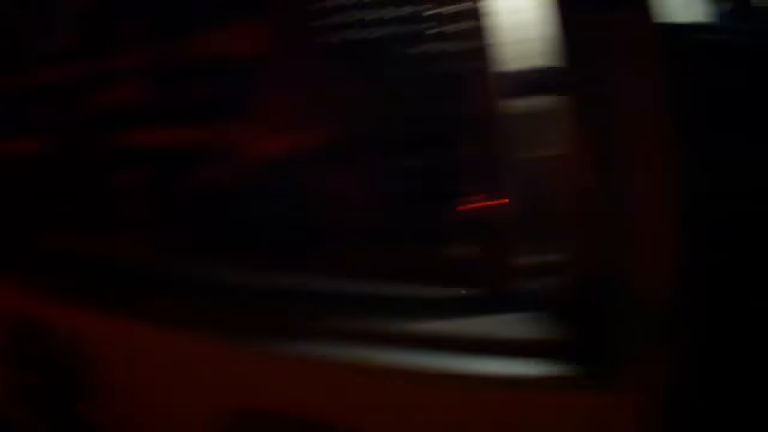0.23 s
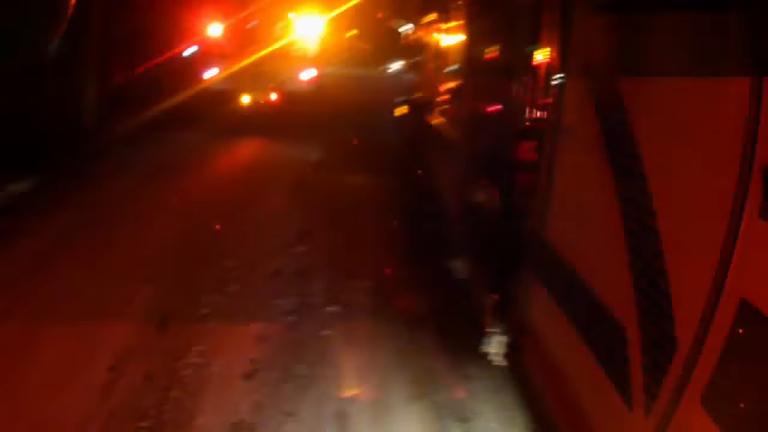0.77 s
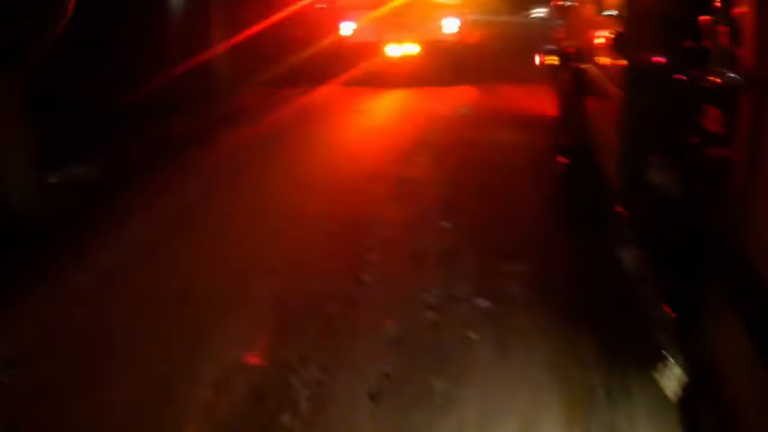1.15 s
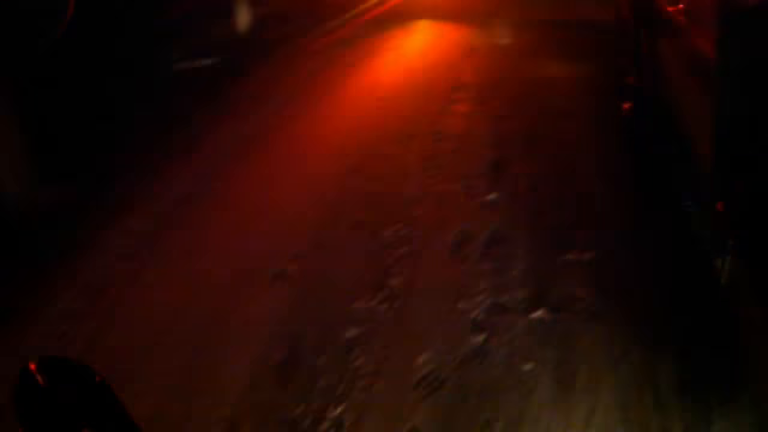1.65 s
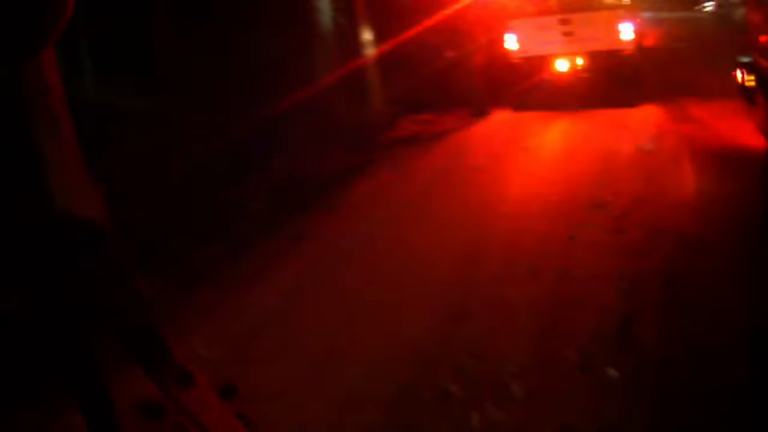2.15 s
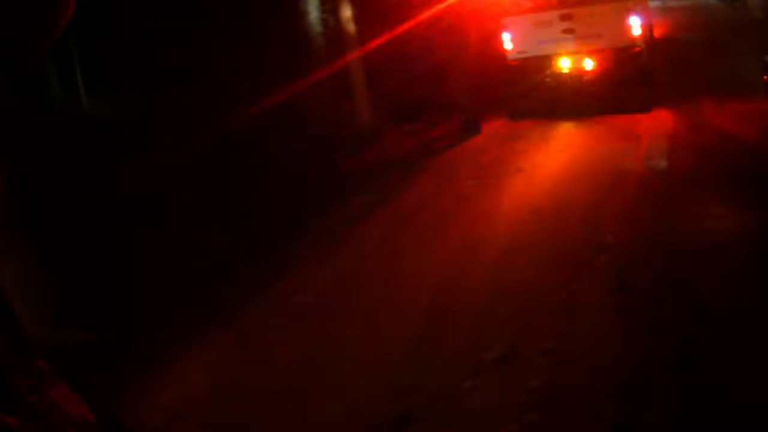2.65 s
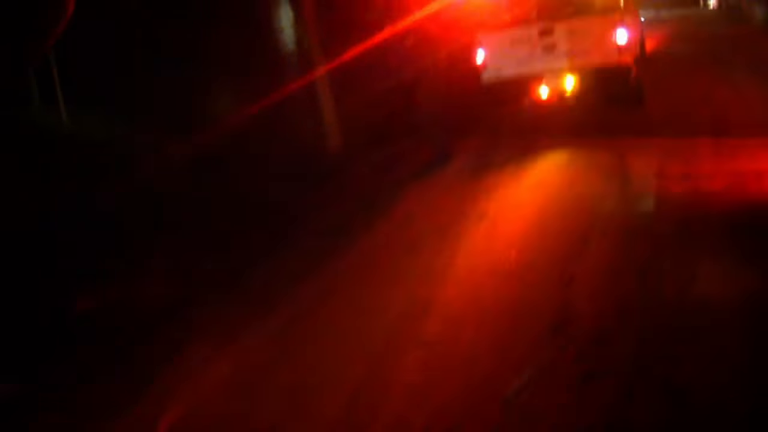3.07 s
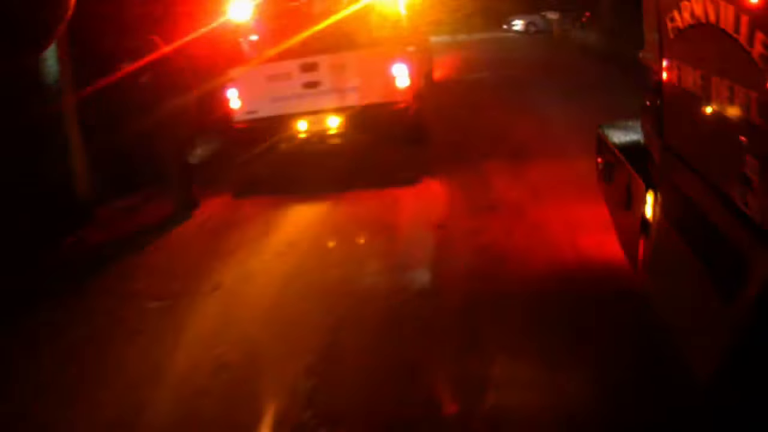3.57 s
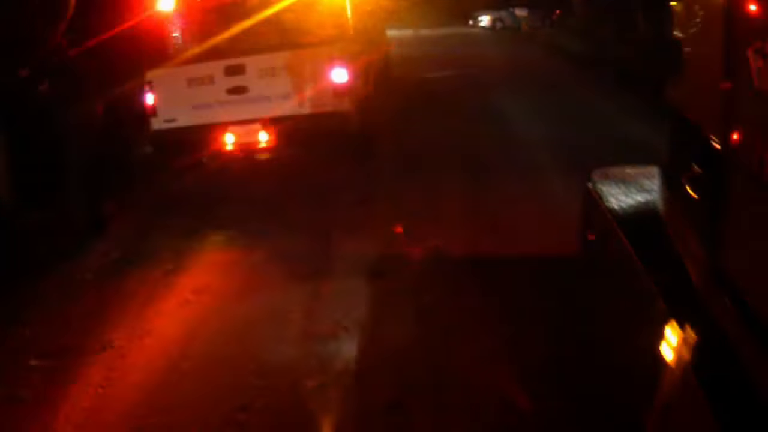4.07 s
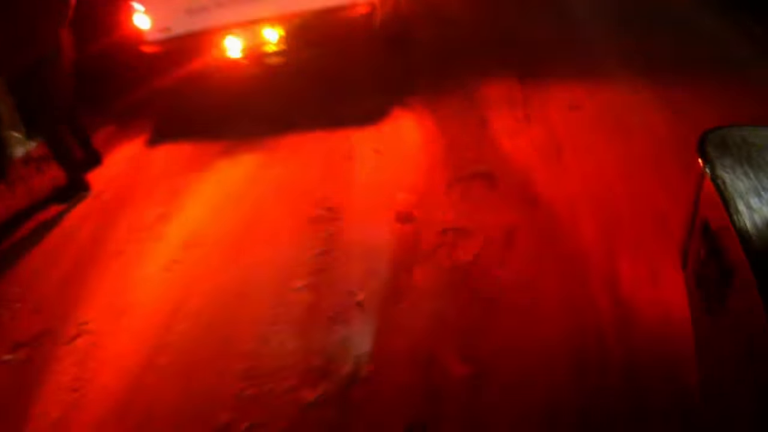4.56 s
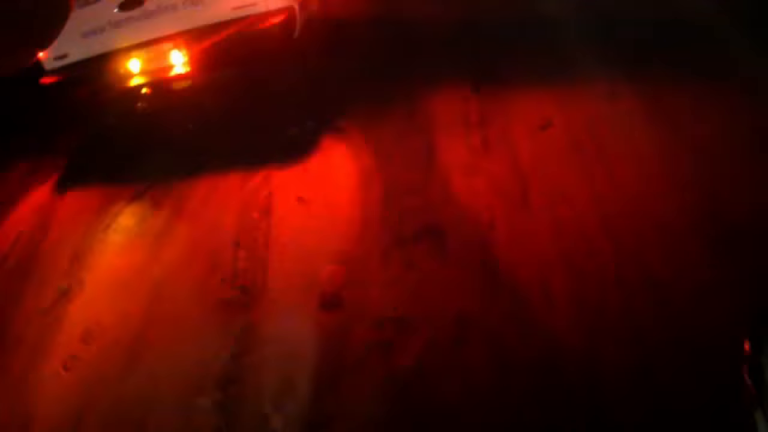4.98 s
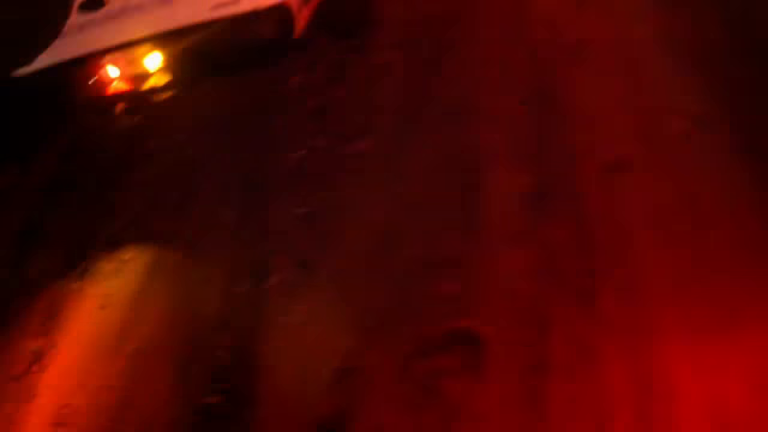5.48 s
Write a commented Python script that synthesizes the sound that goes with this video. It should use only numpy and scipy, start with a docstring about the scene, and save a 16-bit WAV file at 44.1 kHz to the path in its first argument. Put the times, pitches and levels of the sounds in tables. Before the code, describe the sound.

After a brief metallic clink, a big diesel engine runs at high idle, humming, rattling and faintly whistling, slowly growing louder.

```python
"""Walking past a diesel truck

Night; a six-cylinder at fast idle. Its pump hums, swelling and fading along the path. Exhaust orders
throb in a low roar, the block clatters once a firing, the turbocharger whistles over intake hiss.
A metal latch clinks at the start, two dull taps follow. A small housing colours it all."""
import sys
import numpy as np
from scipy import signal
from scipy.io import wavfile
from scipy.ndimage import uniform_filter1d

SR = 44100
rng = np.random.default_rng(int(sys.argv[2]) if len(sys.argv) > 2 else 0)


def wrap_up_sound(samples):
    """Save the sound to the file named by the first command line argument, as 16-bit audio."""
    columns = np.atleast_2d(samples).T
    # keep every value between -1 and 1, then stretch to whole-number steps
    tamed = np.clip(columns, -1, 1)
    steps = np.round(tamed * 32767).astype(np.int16)
    wavfile.write(sys.argv[1], SR, steps)


N = 253120
FIRING_HZ, PUMP_HZ, SOUND_M_PER_S = 50.13, 180.9, 343
KNOCK_OFFSET_S, CUTOFF_HZ = .034, 15700

# pump hum along the path: t/s, level/dB
PUMP_LEVEL = [(0.0, -22), (0.25, -27), (0.37, -22), (0.69, -20), (0.88, -23.5), (1.06, -15.5), (1.2, -18.5),
              (1.3, -13), (1.8, -21.5), (1.9, -17), (2.22, -16), (2.49, -27.5), (3.04, -22), (3.42, -27.5),
              (3.5, -38), (3.74, -28), (3.95, -37), (4.3, -41), (4.4, -25.5), (4.86, -13), (5.02, -17.5),
              (5.21, -13.5), (5.35, -17.5), (5.48, -13.5), (5.74, -15.5)]
# pump overtones and a side line: multiple, level/dB re roar, waver/dB
PUMP_PARTIALS = [(2, -12.5, 3.5), (2.145, -15, 0.5), (3, -18.5, 2.5)]
# pump whines: multiple, level/dB re clatter, width/Hz
PUMP_WHINES = [(7.015, -18, 14), (13.9, -20, 35)]
# engine along the path: t/s, roar/dB, clatter/dB, upper hiss/dB, clatter tilt/(dB/octave)
ENGINE_PATH = [(0.0, -36.5, -40, -63, 0.3), (0.13, -36, -45, -65, -0.7), (0.65, -32, -38, -56, 0.7),
               (1.21, -28, -36, -53.5, 0.3), (1.28, -31.5, -37.5, -54.5, -0.6),
               (1.92, -31.5, -35, -52, -0.4), (2.4, -31, -32, -49, 2), (3.12, -25.5, -31, -48, 0.7),
               (3.18, -28.5, -31.5, -48.5, 0.3), (3.42, -25, -31.5, -50, -0.6),
               (4.08, -26, -28.5, -50.5, 1.8), (4.25, -26.5, -29, -51.5, -0.5),
               (4.47, -28.5, -30.5, -54.5, 0.3), (4.86, -25, -31.5, -58.5, -0.8),
               (5.48, -20.5, -28.5, -52.5, 1.2), (5.74, -25, -28, -52, 5.5)]
# exhaust low end: t/s, rumble/dB, firing harmonics 1, 2, 3/dB
EXHAUST_LEVELS = [(0, -28, -50, -46, -55), (.5, -30.5, -42, -30.5, -44.5), (1.4, -26.5, -43, -34, -44),
                  (1.8, -23.5, -47, -45, -27.5), (2.25, -24, -33, -31, -39), (2.75, -25.5, -43, -31.5, -32),
                  (3.25, -30, -36.5, -38.5, -35), (3.7, -24.5, -35, -29.5, -31),
                  (4.45, -28.5, -28, -31.5, -44), (5.1, -20, -31.5, -42.5, -27.5),
                  (5.74, -26.5, -32.5, -37, -32)]
# crankshaft orders: multiple of crank speed
CRANK_ORDERS = [2, 5, 7, 7.5, 12, 13, 14, 15, 16, 17, 18]
# per order: level/dB re roar
CRANK_ORDER_DB = [-20.5, -14, -20.5, -22, -10, -10.5, -15, -26.5, -24, -15.5, -22]
# knock per cylinder: level/dB
CYLINDER_DB = [0, -4, -4, -9, -9, -5]
# noise spectra through the housing: f/Hz, relative density/dB
RUMBLE_SPECTRUM = [(8, -42), (15, -12), (30, -11.5), (60, -3), (128, -4.5), (170, -1), (200, -8),
                   (230, -43.5)]
ROAR_SPECTRUM = [(150, -38), (175, 1.5), (200, 0), (300, -2.5), (380, -0.5), (440, -9), (480, -12.5),
                 (540, -48)]
GROWL_SPECTRUM = [(390, -40), (430, -6), (470, 1), (590, -4.5), (720, -9.5), (880, -17.5), (1050, -22),
                  (1300, -41)]
CLATTER_SPECTRUM = [(700, -34), (850, -21.5), (1020, -15), (1300, -11.5), (1600, -9.5), (1850, -3.5),
                    (2030, 2), (2200, -3.5), (2500, -11.5), (3050, -20.5), (3280, -28.5), (3400, -35),
                    (3500, -57)]
LOW_HISS_SPECTRUM = [(3250, -30), (3380, -10), (3550, -2), (3950, 0), (4500, -2), (4900, -4), (5150, -10),
                     (5400, -13), (5560, -20), (5650, -40)]
UPPER_HISS_SPECTRUM = [(5480, -40), (5580, -18), (5800, -10), (5920, 0), (6900, 0), (7250, -3), (7900, -2),
                       (8350, -7), (8800, -19), (9150, -28), (9300, -50)]
TOP_HISS_SPECTRUM = [(9000, -30), (9200, -9), (9650, -2), (10100, 0), (10600, -2), (11300, -8), (12000, -5),
                     (12500, -7), (13500, -10), (14000, -7), (14400, -14), (15200, -16), (15800, -20)]
# turbocharger: t/s, whistle/dB, octave/dB
TURBO_LEVELS = [(0, -70.5, -85), (.8, -61, -77), (1.6, -63.5, -81), (2.2, -60, -72.5), (2.9, -56, -67),
                (3.6, -57, -70), (4.2, -63.5, -67), (4.8, -75, -79.5), (5.74, -78.5, -90)]
# turbocharger whistle: t/s, f/Hz
TURBO_HZ = [(0, 5920), (.8, 5912), (1.5, 5885), (2, 5910), (2.5, 5978), (3, 6035), (3.6, 6080), (4.1, 6085),
            (5.2, 5945), (5.74, 5940)]
# latch blows: t/s, level/dB
LATCH_BLOWS = [(.027, -33), (.092, -48), (.163, -48), (.197, -46)]
# latch modes: f/Hz, level/dB, t60/s
LATCH_MODES = [(1992, -4, .15), (2347, 0, .17), (2772, -2, .09), (4570, -14, .15), (6718, -20, .28),
               (7881, -18, .3)]
# nearby taps: t/s, level/dB, centre/Hz
DULL_TAPS = [(1.072, -42, 1250), (1.136, -43, 1150)]
# walking away: t/s, speed/(m/s)
RECEDING_SPEED = [(0, 0), (4.2, 0), (4.8, 1.15), (5.74, 1.55)]


def pump():
    """Clean hum with weaker, rougher overtones and two fuzzy whines."""
    hz, (hum_db,) = doppler(PUMP_HZ), curves(PUMP_LEVEL)
    roar_db, clatter_db, _, _ = curves(ENGINE_PATH)
    partials = sum(tone(k * hz, db + roar_db, waver_db, wobble_rad=.058 * k, drift_hz=12)
                   for k, db, waver_db in PUMP_PARTIALS)
    whines = sum(whistle(k * hz, db + clatter_db, width_hz) for k, db, width_hz in PUMP_WHINES)
    return tone(hz, hum_db, waver_db=.79, wobble_rad=.07, drift_hz=12) + partials + whines


def firings(decay_s, scatter_db):
    """Knock envelope: quick rise, then decay; each cylinder has its own strength."""
    hz = doppler(FIRING_HZ)
    count = np.cumsum(hz) / SR - KNOCK_OFFSET_S * hz[0] + 6
    index, age_s = count.astype(int), count % 1 / hz
    db = np.array(CYLINDER_DB)[index % 6] + scatter_db * rng.standard_normal(index.max() + 1)[index]
    return uniform_filter1d(amp(db) * np.exp(-age_s / decay_s), size=40)


def exhaust(knock):
    """Firing harmonics and crank orders (three firings a turn) in rumble, pulsed roar and growl."""
    roar_db, clatter_db, _, _ = curves(ENGINE_PATH)
    rumble_db, *harmonic_db = curves(EXHAUST_LEVELS)
    hz = doppler(FIRING_HZ)
    harmonics = sum(tone(k * hz, db, waver_db=.6, wobble_rad=.2, drift_hz=6.6)
                    for k, db in enumerate(harmonic_db, 1))
    orders = sum(tone(k * hz / 3, db + roar_db, waver_db=4.4, wobble_rad=.43, drift_hz=3)
                 for k, db in zip(CRANK_ORDERS, CRANK_ORDER_DB))
    rumble = shaped_noise(1, RUMBLE_SPECTRUM, rumble_db - 2.5, patch_db=1.1)
    roar = shaped_noise(1 + .4 * knock, ROAR_SPECTRUM, roar_db + .4, patch_db=.5)
    growl_db = -35 + .2 * swing(roar_db) + .9 * swing(clatter_db)
    growl = shaped_noise(1 + .3 * knock, GROWL_SPECTRUM, growl_db, patch_db=1)
    return harmonics + orders + rumble + roar + growl


def block_clatter(knock):
    """Noise gated by the firings; brightness varies along the path."""
    _, clatter_db, _, _ = curves(ENGINE_PATH)
    tilts = [(t_s, tilt) for t_s, *_, tilt in ENGINE_PATH]
    return shaped_noise(1 + 1.1 * knock, CLATTER_SPECTRUM, clatter_db, patch_db=.8, tilts=tilts)


def intake_hiss(knock):
    """Three noise bands, only ruffled by the firings."""
    _, clatter_db, upper_db, tilt = curves(ENGINE_PATH)
    low_db = -53.5 + .38 * swing(upper_db) + .98 * tilt
    top_db = -71 + .6 * swing(upper_db) + .45 * swing(clatter_db) + .9 * tilt
    return (shaped_noise(1 + .24 * knock, LOW_HISS_SPECTRUM, low_db, patch_db=.7)
            + shaped_noise(1 + .5 * knock, UPPER_HISS_SPECTRUM, upper_db + .54, patch_db=1.5)
            + shaped_noise(1 + .3 * knock, TOP_HISS_SPECTRUM, top_db, patch_db=-.3))


def turbocharger():
    """Fuzzy whistle and its octave."""
    (hz,), (db, octave_db) = curves(TURBO_HZ), curves(TURBO_LEVELS)
    return whistle(hz, db, width_hz=35) + whistle(2 * hz, octave_db, width_hz=80)


def latch():
    """Each blow rings the same metal modes in a new balance."""
    out, t = np.zeros(N), np.arange(SR // 3) / SR
    attack = 1 - np.exp(-t / .0022)
    for start_s, blow_db in LATCH_BLOWS:
        scatter_db = 1.1 * rng.standard_normal(len(LATCH_MODES))
        ring = sum(amp(db + offset_db - 60 * t / t60_s) * np.sin(2 * np.pi * hz * t)
                   for (hz, db, t60_s), offset_db in zip(LATCH_MODES, scatter_db))
        out[round(start_s * SR):][:len(t)] += amp(blow_db) * ring * attack
    return out


def taps():
    """Brief, soft-edged bursts of band noise."""
    out, t = np.zeros(N), np.arange(900) / SR
    for start_s, db, hz in DULL_TAPS:
        band = signal.butter(3, [hz * .7, hz * 1.3], "band", fs=SR, output="sos")
        burst = rng.standard_normal(len(t)) * t * np.exp(-t / .002)
        out[round(start_s * SR):][:len(t)] += amp(db) * unit_rms(signal.sosfilt(band, burst))
    return out


def doppler(hz):
    """Pitch drops as the listener walks away."""
    return hz * (1 - curves(RECEDING_SPEED)[0] / SOUND_M_PER_S)


def tone(hz, db, waver_db, wobble_rad, drift_hz):
    """Sine with drifting level and phase."""
    phase = 2 * np.pi * (np.cumsum(hz) / SR + rng.random()) + wobble_rad * drift(drift_hz)
    return np.sqrt(2) * amp(db + waver_db * drift(drift_hz)) * np.sin(phase)


def whistle(hz, db, width_hz):
    """Noise in a narrow moving resonance: a fluttering line."""
    pole = np.exp(-np.pi * width_hz / SR)
    noise = rng.standard_normal(N) + 1j * rng.standard_normal(N)
    flutter = signal.lfilter([1], [1, -2 * pole, pole * pole], noise)
    carrier = np.exp(2j * np.pi * np.cumsum(hz) / SR)
    return amp(db) * unit_rms((flutter * carrier).real)


def shaped_noise(gate, spectrum, db, patch_db, tilts=((0, 0), (1, 0))):
    """Gated noise through a spectrum with drifting patches; tilts: t/s, dB/octave about 2 kHz."""
    hz, t, bins = signal.stft(gate * rng.standard_normal(N), SR, nperseg=1024, noverlap=768)
    patches = uniform_filter1d(rng.standard_normal(bins.shape), size=10, axis=0)
    patches = unit_rms(uniform_filter1d(patches, size=16, axis=1))
    knot_hz, knot_db = np.transpose(spectrum)
    colour_db = np.interp(np.log(hz + 1), np.log(knot_hz + 1), knot_db, -120, -120)
    tilt_db = np.outer(np.log2((hz + 1) / 2000), np.interp(t, *np.transpose(tilts)))
    bins *= amp(colour_db[:, None] + tilt_db + patch_db * patches)
    noise = signal.istft(bins, SR, nperseg=1024, noverlap=768)[1][:N]
    return amp(db) * unit_rms(noise)


def drift(top_hz):
    """Slow random wander, rms 1."""
    t = np.arange(0, N + 256, 256) / SR
    slow = sum(np.sin(2 * np.pi * (hz * t + rng.random())) / np.sqrt(hz)
               for hz in np.geomspace(top_hz / 10, top_hz, num=24))
    return np.interp(np.arange(N) / SR, t, unit_rms(slow))


def curves(rows):
    """Columns after t/s, one value a sample."""
    t_s, *columns = np.transpose(rows)
    return [np.interp(np.arange(N) / SR, t_s, column) for column in columns]


def swing(db):
    return db - db.mean()


def amp(db):
    return 10 ** (np.asarray(db) / 20)


def unit_rms(x):
    return x / np.sqrt(np.mean(x ** 2) + 1e-20)


def scene():
    """Truck, latch and taps; mono."""
    knock = firings(decay_s=.008, scatter_db=1.6)
    engine = exhaust(knock) + block_clatter(knock) + intake_hiss(knock)
    return (pump() + engine + turbocharger() + latch() + taps())[None]


def record(dry):
    """Small microphone: slightly taller peaks one way, then a low-pass."""
    bent = dry + .052 * (dry ** 2 - uniform_filter1d(dry ** 2, size=4000))
    lowpass = signal.firwin(511, CUTOFF_HZ, window=("kaiser", 9), fs=SR)
    return signal.oaconvolve(bent, lowpass[None], "same")


dry = scene()
out = record(dry)
wrap_up_sound(out)
```